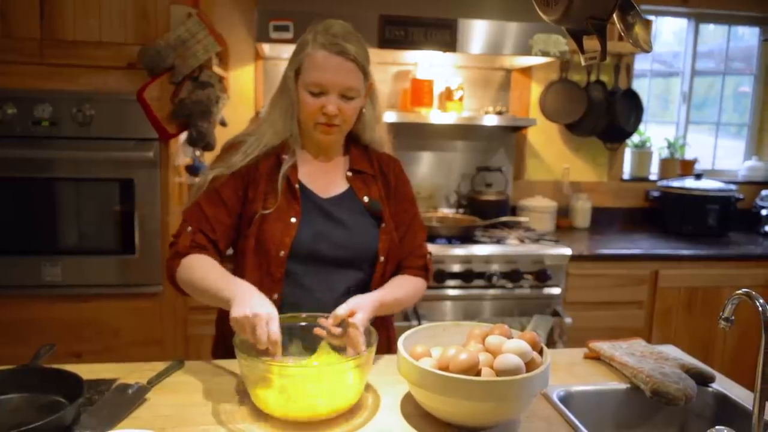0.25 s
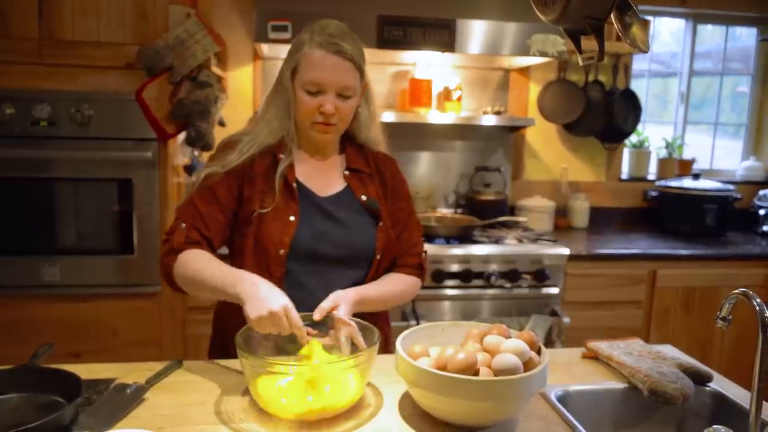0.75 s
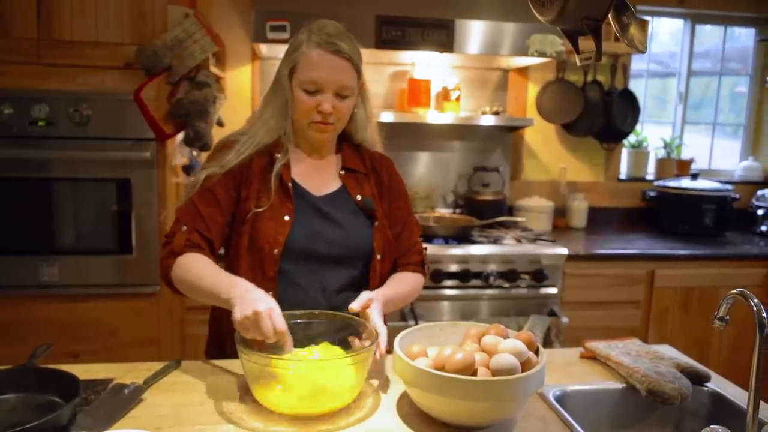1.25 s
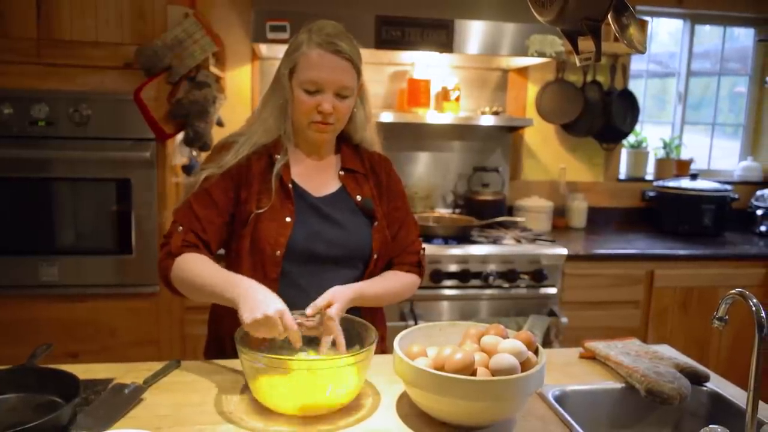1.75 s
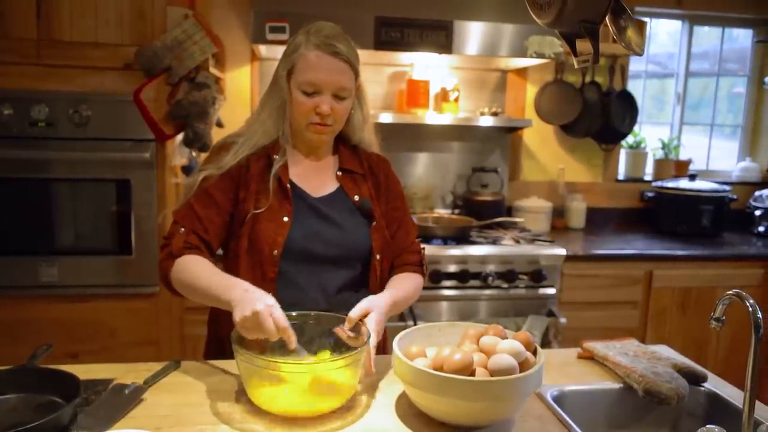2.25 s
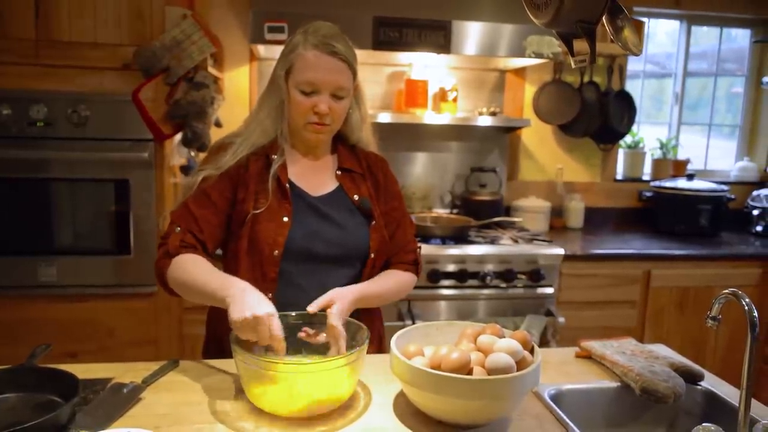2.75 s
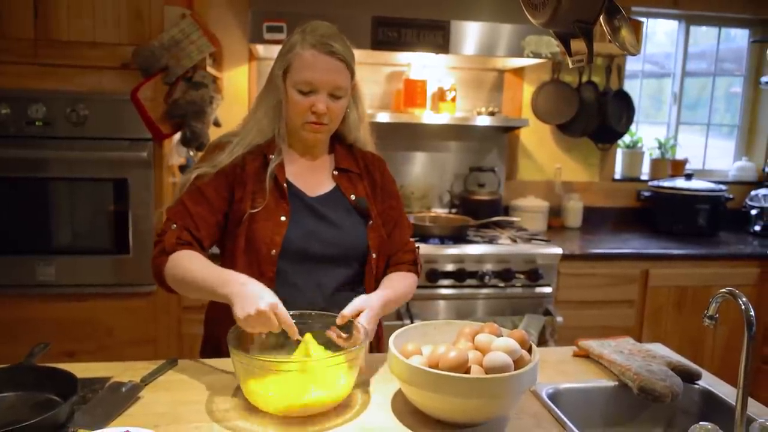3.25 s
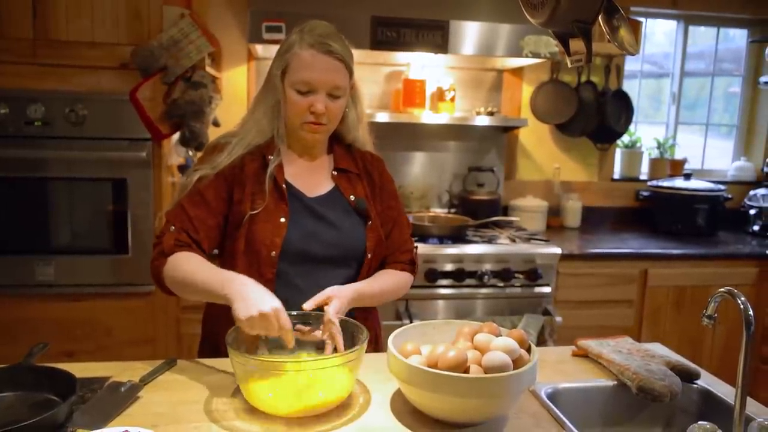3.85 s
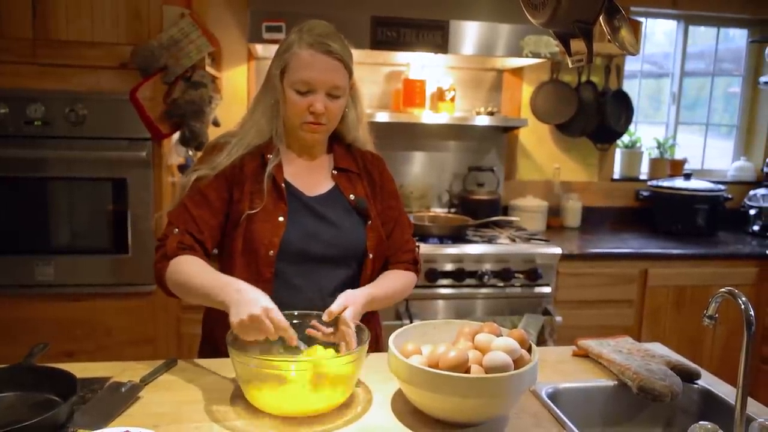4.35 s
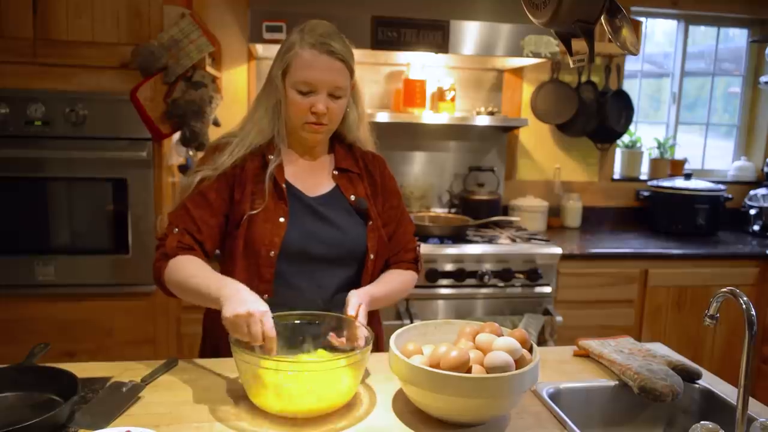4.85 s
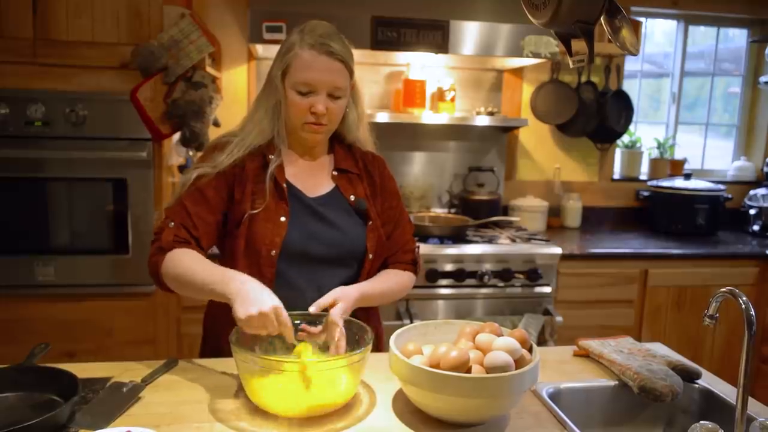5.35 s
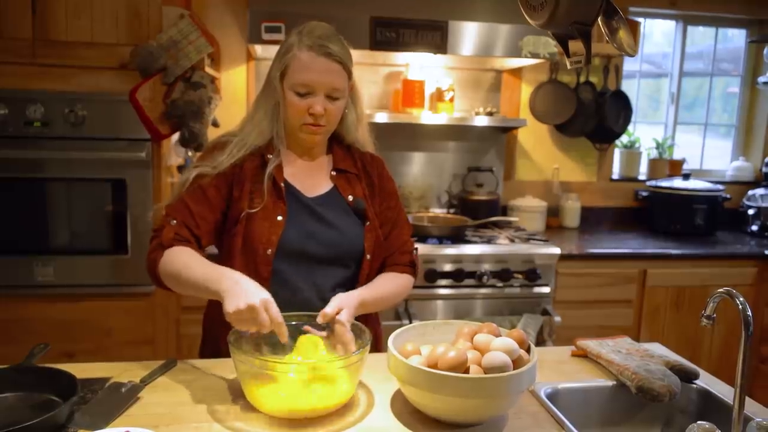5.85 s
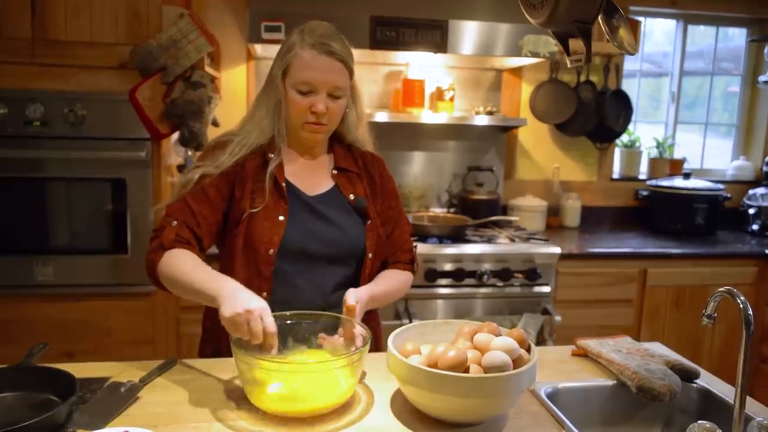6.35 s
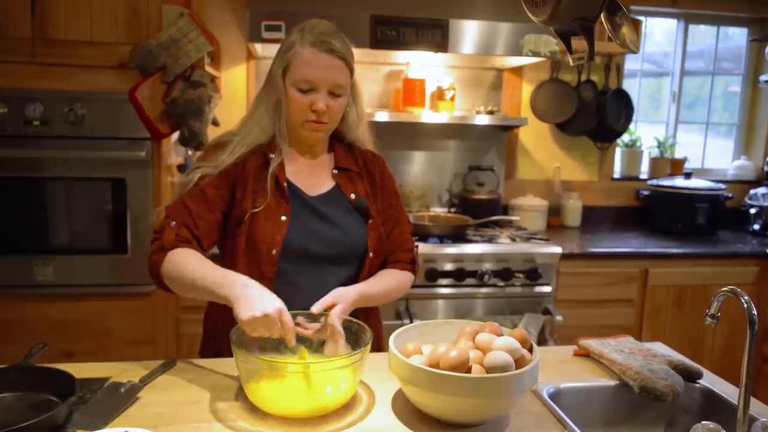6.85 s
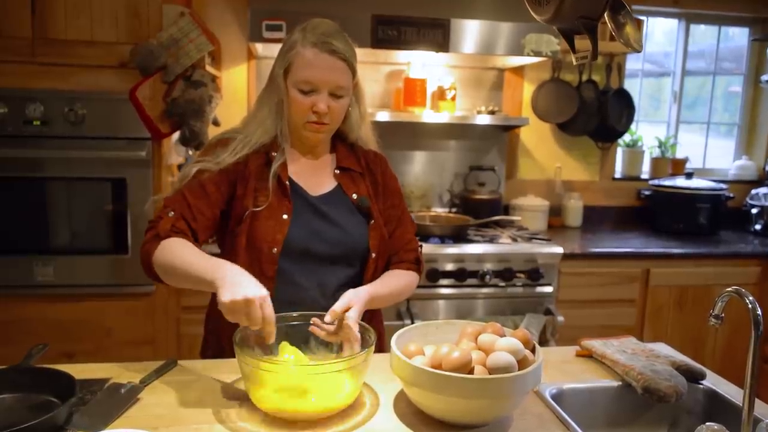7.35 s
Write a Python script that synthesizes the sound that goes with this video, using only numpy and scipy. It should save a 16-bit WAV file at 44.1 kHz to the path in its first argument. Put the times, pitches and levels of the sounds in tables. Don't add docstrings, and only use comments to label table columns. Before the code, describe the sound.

Close, brisk whisking of eggs: steel tines clink on glass in a quick even rhythm, liquid slopping and bubbling, in a quiet kitchen.

```python
import sys
import numpy as np
from scipy import signal
from scipy.fft import rfft, irfft
from scipy.io import wavfile
from scipy.ndimage import uniform_filter1d

SR = 44100
rng = np.random.default_rng(int(sys.argv[2]) if len(sys.argv) > 2 else 0)


def volts_from_decibels(level):
    exponent = np.asarray(level, float) / 20
    return 10 ** exponent


def pcm_store(signal):
    levels = np.round(np.clip(np.atleast_2d(signal), -1, 1) * 32767)
    wavfile.write(sys.argv[1], SR, levels.astype(np.int16).T)


N = 334719

# (time [s], glass ring level [dB], tine ring level [dB], contact [ms])
DIPS = [(0.104, -33.5, -39, 1.1), (0.3205, -44, -36.5, 5.3), (0.5099, -27.5, -27, 1.5),
        (0.7264, -39.5, -36.5, 8.1), (0.9481, -26.5, -28, 2.5), (1.1346, -33, -25.5, 11),
        (1.3672, -41, -40, 12), (1.5685, -41.5, -47, 6.3), (1.7704, -41, -41, 1.6),
        (1.9682, -37, -42, 0.97), (2.1671, -36.5, -39, 0.6), (2.3843, -35.5, -46, 0.6),
        (2.787, -43.5, -38, 1.9), (3.012, -41.5, -48.5, 11), (3.2156, -41, -37.5, 33),
        (3.4392, -36, -35, 0.28), (3.645, -39, -25, 17), (3.862, -41, -44, 4), (4.2765, -33, -29.5, 4.1),
        (4.4792, -43.5, -24.5, 5.3), (4.703, -41, -30, 0.7), (4.915, -39, -47, 15),
        (5.13, -40.5, -28.5, 3.6), (5.342, -41.5, -45, 34), (5.5317, -31, -34, 3.2), (5.741, -44, -48, 8.5),
        (6.8768, -27, -32, 0.9), (7.081, -37, -34, 0.45), (7.259, -45, -43, 2.3)]
# (time [s], glass ring level [dB], tine ring level [dB], contact [ms])
STRIKES = [(.127, -33, -27, 1), (0.3382, -33.5, -27.5, 0.71), (0.5406, -32.5, -31, 0.84),
           (0.7504, -30.5, -26, 0.18), (0.9652, -34.5, -30, 5.5), (1.1765, -33, -33, 3.5),
           (1.3853, -28, -24.5, 0.79), (1.588, -38, -35, 2.1), (1.7904, -34, -35, 0.94),
           (1.978, -32.5, -31.5, 5.4), (2.1854, -35.5, -29.5, 13), (2.398, -32.5, -26.5, 3.3),
           (2.818, -37.5, -33.5, 1.2), (3.0279, -37, -38, 17), (3.243, -29, -30, 1.3),
           (3.456, -31, -25, 1.06), (3.6664, -32.5, -26, 3.8), (3.8742, -27.5, -28, 2.7),
           (4.305, -30.5, -34.5, 2.2), (4.4943, -32.5, -32.5, 20), (4.7239, -42.5, -42.5, 2.9),
           (4.9454, -35, -28, 4.5), (5.161, -40, -30.5, 1.5), (5.375, -32, -26.5, 0.42),
           (5.5793, -31, -28, 2.6), (5.7883, -31, -28, 0.98), (6.8919, -44, -28.5, 1.6),
           (7.087, -33.5, -37.5, 18.4), (7.2856, -34.5, -26.5, 6.7)]
# (time [s], glass ring level [dB], tine ring level [dB], contact [ms])
SLAPS = [
    (2.5954, -30.5, -29.5, 1.4),
    (4.067, -32.5, -25.5, 2.5),
    (6.0199, -33.5, -24, 2.3),
    (6.2462, -31, -20.5, 3),
    (6.4658, -34.5, -28, 3.5),
    (6.6833, -35, -29, 1.5),
    (7.4944, -34.5, -21.5, 1.9),
]
# (time [s], glass ring level [dB], contact [ms])
RETURNS = [(0.1953, -33.5, 6.6), (0.4047, -36, 6.5), (0.6321, -41, 1), (0.8104, -36, 29),
           (1.0316, -38.5, 4), (1.4294, -37.5, 31), (1.645, -44, 26), (1.848, -38.5, 2.9),
           (2.041, -40.5, 19), (2.256, -37, 20), (2.482, -39.5, 2.9), (2.667, -47, 30),
           (3.0939, -37.5, 18.5), (3.2955, -41.5, 21), (3.5277, -38, 11), (3.7303, -39.5, 30),
           (3.952, -34, 14), (4.1647, -38.5, 10), (4.369, -41, 5.9), (4.5795, -37, 8.9), (5.018, -37.5, 19),
           (5.235, -35.5, 2.8), (5.4421, -31, 4.8), (5.647, -34, 0.79), (6.3177, -35, 2.7),
           (6.7453, -44, 3.1), (6.9463, -38, 34), (7.161, -41.5, 9.6), (7.5562, -43, 17)]
# (time [s], glass ring level [dB], contact [ms])
GRAZES = [(.001, -46.5, 26), (0.52, -46, 3.4), (1.253, -42, 15), (2.881, -46, 9.7), (3.8855, -32.5, 3.2),
          (4.938, -44.5, 2.7), (5.15, -40, 3.1), (5.3168, -36.5, 0.51), (5.3888, -50.5, 4),
          (5.762, -45, 16), (5.9268, -45, 0.2), (5.967, -48, 0.7), (6.196, -48.5, 78), (6.538, -42, 9.3),
          (6.641, -47, 5.7), (6.669, -41.5, 3.4), (6.7338, -34.5, 35), (7.4118, -45.5, 8.9),
          (0.28, -50.5, 3.4), (0.476, -51.5, 2.3), (0.673, -44, 2.2), (5.544, -34.5, 2.9),
          (3.8746, -28, 2.2), (3.601, -55, 95), (4.08, -43, 1.7), (7.3, -46, 12)]
# (frequency [Hz], bandwidth [Hz], level [dB])
GLASS_MODES = [
    (2000, 700, -16.5),
    (3160, 630, -19.5),
    (4690, 33, -20.5),
    (5610, 450, -22),
    (6260, 78, -23),
    (7480, 31, -13.5),
    (8060, 130, -19),
]
# (frequency [Hz], bandwidth [Hz], level [dB])
STEEL_MODES = [
    (10250, 260, -8),
    (11500, 300, 1),
    (12550, 340, 0),
    (14950, 500, -7),
]
# (time of peak [s], level [dB], frequency [Hz], half length [ms])
PLOPS = [(.1069, -31.5, 621, 4.8), (0.353, -34, 558, 2.3), (0.5303, -37, 576, 3.1),
         (0.9526, -18, 547.5, 2.7), (1.152, -34, 543, 4.8), (1.372, -30, 506, 5.9),
         (1.5715, -20, 496, 3.05), (1.9757, -29, 584, 3), (2.1816, -29.5, 557, 14.7),
         (2.39, -21.5, 702, 1.4), (2.5963, -13, 584, 3.4), (3.017, -20.5, 492.4, 2.9),
         (2.173, -27, 392, 4.5), (3.442, -22, 510.4, 3.5), (3.6517, -35, 583, 7), (3.8769, -23, 533, 2.85),
         (4.082, -19.5, 453.5, 2.66), (4.289, -30.5, 553, 5.3), (4.5, -21.5, 454, 4.1),
         (4.713, -40, 567, 10.5), (5.5319, -31, 683, 3.1), (6.09, -44, 498, 14), (6.4293, -23.5, 544, 2.44),
         (7.0811, -19.5, 597, 2.14), (7.4171, -26.5, 492, 8), (7.44, -35, 540, 8.2)]
# (time of peak [s], level [dB], frequency [Hz], half length [ms])
GLUGS = [(0.0259, -46.5, 609, 17), (0.1357, -44.5, 622, 19), (1.772, -31.5, 534, 3.7),
         (0.6891, -34.5, 555, 9.6), (0.8846, -42, 498, 34), (1.47, -34.5, 860, 2.5), (1.4791, -32, 564, 5),
         (1.5121, -40, 591, 15), (1.535, -39.5, 401, 14), (1.6093, -37.5, 550, 2), (1.8097, -35, 543, 4.7),
         (2.3541, -43, 716, 6.6), (2.634, -37, 570, 6.2), (2.6355, -29.5, 682, 2.8), (3.603, -39.5, 604, 6),
         (2.6799, -43, 555, 5.8), (2.7103, -41, 641, 2.7), (2.9483, -45.5, 534, 6.3),
         (3.4685, -43, 526, 4.8), (3.605, -43.5, 852, 11), (4.3325, -28, 548, 2.3), (4.301, -28, 408, 4),
         (5.133, -44.5, 722, 8.7), (5.9475, -39, 614, 6.7), (5.9764, -47, 588, 10), (6.045, -42.5, 500, 10),
         (6.112, -45.5, 712, 4.4), (6.14, -42.5, 478, 16), (6.21, -54, 698, 28), (7.1178, -40.5, 604, 20),
         (7.47, -44, 511, 9.4)]
# (time of peak [s], level [dB], frequency [Hz], half length [ms])
BLIPS = [(0.7558, -19.5, 1370.0, 2.5), (0.7817, -34.5, 1340.0, 8.1), (0.7997, -26.5, 1106, 0.99),
         (0.8007, -36.5, 823, 6.7), (0.8143, -27, 1202, 1.4), (0.9492, -30, 1750.0, 2.6),
         (0.97, -35, 1266, 3.3), (1.1808, -25, 1660, 2.9), (1.3826, -27, 1240, 3.8),
         (1.3892, -22.5, 1540.0, 3.2), (1.4373, -26.5, 1253, 6.1), (1.772, -36.5, 1085, 1.9),
         (2.0478, -32, 1090.0, 2.7), (2.1732, -38, 1065, 3.2), (2.188, -32, 1154, 3.2),
         (2.191, -23, 1392, 1.3), (2.213, -26.5, 1236, 2), (2.2587, -34, 1062, 3.3),
         (2.4073, -37.5, 1001, 8.5), (2.4165, -29, 1297, 2.2), (3.0211, -39.5, 1030.0, 3.7),
         (3.0484, -32, 1580, 6.2), (3.099, -35, 1017, 3.6), (3.4307, -30.5, 1197, 2.1),
         (3.6572, -34.5, 884, 11), (3.677, -28.5, 1308, 2), (3.734, -28.5, 1129, 2.4),
         (4.071, -33, 1180, 4.6), (4.1674, -37.5, 1047, 2.8), (4.298, -25, 1750, 1.8),
         (4.373, -34.5, 1043, 4.3), (4.9462, -25.5, 1249, 2.4), (5.0221, -31.5, 1005, 2.5),
         (5.109, -34, 1162, 4.6), (5.1635, -32, 1244, 2.2), (5.237, -33, 990, 2.9),
         (5.3476, -26, 1430, 1.5), (5.3732, -29.5, 1183, 5.3), (5.3813, -30, 1438, 4),
         (5.4706, -39, 1177, 7.5), (5.5954, -33.5, 1370.0, 3.7), (5.6502, -37, 1099, 4.8),
         (5.7943, -28.5, 1320, 3.9), (5.97, -33.5, 1585, 1.5), (6.027, -36.5, 1230, 6.2),
         (6.224, -35, 1103, 2), (6.4738, -27, 1750.0, 1.1), (6.718, -25.5, 1245, 1.9),
         (6.7449, -31.5, 1006, 4.3), (7.3096, -34, 1300, 5), (7.4173, -24, 1710, 2.4),
         (7.5064, -31, 1344, 4.2)]
# (time of peak [s], level [dB], frequency [Hz], half length [ms])
SPITS = [(0.8196, -31, 2190.0, 1.8), (0.8385, -34.5, 3110, 3.2), (1.142, -32, 2980, 2.7),
         (1.4337, -36, 3060, 2.5), (1.571, -29, 3010, 1.6), (1.7934, -35, 2200.0, 5.9),
         (1.8493, -42.5, 2290.0, 4.8), (1.9795, -29.5, 2090.0, 2.4), (2.1905, -25.5, 2080.0, 1.1),
         (2.4005, -34, 2190.0, 3.1), (2.442, -37, 2700.0, 2.7), (2.4834, -27.5, 2310.0, 1.1),
         (2.6046, -29.5, 2110.0, 2.0), (3.0306, -30, 2080.0, 2.6), (3.0274, -28.5, 3100, 1.5),
         (3.1, -40, 2210.0, 3.8), (3.505, -39.5, 2940, 2), (3.533, -33.5, 2290.0, 3.3),
         (3.8902, -29, 2090.0, 2), (3.9568, -30, 2310.0, 4.3), (3.9635, -35, 3160, 3.8),
         (4.0684, -31.5, 2230.0, 1.8), (4.071, -34.5, 2850, 3.5), (4.3753, -40.5, 3310, 4.8),
         (4.5152, -41, 2060.0, 6.4), (4.5835, -36.5, 3400, 3.8), (4.589, -38, 2340, 11),
         (4.9483, -32.5, 2210, 5.7), (5.0264, -32, 2986, 2.8), (5.0296, -38.5, 3360, 6.5),
         (5.2445, -39.5, 2400, 8.7), (5.38, -34.5, 3980, 4.1), (5.5958, -35.5, 3000, 1.8),
         (5.7896, -29, 3320, 2), (7.3224, -36.5, 2060.0, 3.4), (6.3201, -31.5, 2200.0, 3),
         (6.5466, -38.5, 1985, 6.8), (6.7407, -37.5, 2000.0, 7.1), (6.8686, -38, 2330.0, 3.5),
         (6.951, -25.5, 3196, 0.56), (7.1646, -30.5, 2250.0, 3.4), (7.297, -35.5, 2840, 3.1)]
# (time of peak [s], level [dB], frequency [Hz], half length [ms])
PINGS = [(0.1297, -30, 5720, 1.6), (0.525, -29.5, 5780, 3.9), (0.8163, -34, 7330, 3.4),
         (1.0346, -32, 5000, 3.4), (1.137, -26, 5300, 1.6), (1.141, -31.5, 6350, 4.3),
         (1.1559, -42.5, 5590.0, 11), (1.9785, -31, 5760, 1), (2.187, -40, 5700.0, 6.7),
         (2.404, -34, 5860, 6.3), (3.221, -37, 5480, 4.1), (3.2446, -28, 5670.0, 1.2),
         (3.5295, -34, 4770.0, 2.5), (3.652, -32, 5500, 3.1), (3.8767, -31, 4770.0, 1.7),
         (3.955, -25.5, 4755, 1.7), (4.1725, -38.5, 4530.0, 3), (4.48, -28, 5250, 1.2),
         (5.0268, -31.5, 4690.0, 5.9), (5.3805, -36.5, 5620, 8.1), (5.4434, -30.5, 4560, 1.3),
         (5.5804, -31, 5400.0, 3.4), (5.6487, -27.5, 4880.0, 1.9), (5.7938, -34, 5350, 3.1),
         (6.025, -26.5, 5320, 1.3), (6.2478, -32.5, 6330, 3.4), (6.686, -29.5, 5570.0, 1.9),
         (6.746, -39, 7530, 5.7), (6.8938, -33, 5710.0, 2.4), (6.9656, -35, 4640.0, 1.1),
         (7.4946, -33.5, 6590, 2.2)]
# (time of peak [s], level [dB], frequency [Hz])
KNOCKS = [(0.21, -39, 275), (0.3499, -34.5, 287), (0.8708, -35, 274), (1.479, -28, 330.3),
          (1.507, -32.5, 274.7), (1.6664, -39.5, 304), (1.7738, -23, 353), (1.8732, -42.5, 308),
          (1.973, -29.5, 321), (2.268, -34.5, 348), (3.259, -40, 306), (3.462, -42, 281), (3.54, -45, 306),
          (3.745, -44.5, 261), (3.96, -35, 338), (4.17, -43.5, 341), (4.392, -42.5, 267),
          (4.5872, -40, 324.4), (4.773, -43.5, 296.5), (5.0278, -37.5, 330), (5.245, -40, 328),
          (5.4492, -36.5, 320.5), (5.625, -42, 301), (5.6516, -40.5, 307), (5.831, -39.5, 290),
          (6.056, -38, 255.5), (6.083, -37, 282), (6.108, -37.5, 305), (6.3419, -39, 243),
          (6.548, -47, 357), (6.765, -41, 274), (6.966, -33, 279), (7.171, -41.5, 347), (7.5081, -43, 292)]
# (pitch ratio, relative level [dB])
KNOCK_OVERTONE = (2, -17.5)
# (time of peak [s], level [dB])
CLUNKS = [(0.1059, -27.5), (0.2822, -42), (0.329, -17.5), (0.508, -29), (1.9698, -22), (2.5924, -22.5),
          (3.229, -17), (4.08, -24.5), (4.297, -23), (7.121, -34.5), (1.206, -37.5), (5.4433, -39),
          (6.2475, -30.5), (6.32, -26), (6.8758, -22.5), (6.951, -24.5)]
# (frequency [Hz], bandwidth [Hz], level [dB])
BODY_MODES = [
    (275, 18, 5),
    (350, 22, 1),
    (552, 22, 1.5),
    (670, 34, 4),
    (870, 30, -1),
    (1070, 35, 2.5),
]
# (frequency [Hz], reverberation time [s])
ROOM_DECAY = [
    (300, 0.4),
    (3000, 0.14),
    (15000, 0.41),
]
# (frequency [Hz], level [dB per Hz])
AIR_SPECTRUM = [
    (500, -36),
    (1000, -2),
    (16000, -24),
]
# (time [s], rumble level [dB])
ROCKING = [
    (1.4, -65.5),
    (2.8, -66.5),
    (4.4, -68.5),
    (5.4, -63),
    (7.6, -64),
]
# (frequency [Hz], bandwidth [Hz], level [dB])
COUNTER_MODES = [(67.0, 36, 0.5), (158.7, 48, 6.2)]

DIP_HZ, STRIKE_HZ, RETURN_HZ, GRAZE_HZ = 6000, 5750, 4700, 5200
RETURN_STEEL_DB, GRAZE_STEEL_DB = 1.5, -3.5
REFERENCE_DB = -30
TOUCH_LEAD = 400
POCKET_LEAD = .03


def fork():
    touches = [(*row, DIP_HZ) for row in DIPS]
    touches += [(*row, STRIKE_HZ) for row in STRIKES + SLAPS]
    touches += [(s, db, db + RETURN_STEEL_DB, ms, RETURN_HZ) for s, db, ms in RETURNS]
    touches += [(s, db, db + GRAZE_STEEL_DB, ms, GRAZE_HZ) for s, db, ms in GRAZES]
    clicks = np.zeros(N)
    for s, *touch in touches:
        add(clicks, s - TOUCH_LEAD / SR, tine(*touch))
    return clicks


def tine(glass_db, steel_db, ms, place_hz):
    t, hz = np.arange(-TOUCH_LEAD, 8192 - TOUCH_LEAD) / SR, np.fft.rfftfreq(8192, 1 / SR)
    contact = np.exp(-t / (ms * 0.00051)) * np.clip(t / (ms * 0.00009), 0, 1)
    drag = 0.033 * np.exp(-abs(t) / np.where(t < 0, .004, .02))

    octave_gap = np.log(np.array(GLASS_MODES)[:, :1] / place_hz)
    near = volts_from_decibels(9 * np.exp(-(octave_gap / .06) ** 2))
    spot = volts_from_decibels(5 * rng.standard_normal((len(GLASS_MODES) + len(STEEL_MODES), 1)))
    steel_spot, glass_spot = spot[:len(STEEL_MODES)], spot[len(STEEL_MODES):]
    wet = 1 + .007 * rng.standard_normal(2)

    grit = rng.standard_normal(len(hz))
    fine = evened(uniform_filter1d(grit, size=40))
    broad = evened(uniform_filter1d(grit, size=350))
    minor = causal(volts_from_decibels(4.5 * fine + 3.5 * broad))
    scrape = 0.19 / (1 + (hz / 7500) ** 4) * hz / (hz + 900) * minor
    glass = (np.maximum(near * 2.14, glass_spot) * modes(GLASS_MODES, hz * wet[0])).sum(0) + scrape
    steel = (steel_spot * modes(STEEL_MODES, hz * wet[1])).sum(0) + 0.042 * minor * (hz / 12000) ** 2

    dull = 1 / (1 + 1j * hz / 3000) ** 2
    floor_db = glass_db - 4.5 + 0.16 * (glass_db - REFERENCE_DB + 4)
    out = 0
    for db, body in ((floor_db, glass * dull), (glass_db, glass * (1 - dull)), (steel_db, steel)):
        clumps = volts_from_decibels(7 * evened(uniform_filter1d(rng.standard_normal(len(t)), size=90)))
        grains = rng.standard_normal(len(t)) * volts_from_decibels(3.95 * np.minimum(rng.exponential(1, len(t)), 5))
        chatter = grains * (contact * clumps ** .5 + drag * clumps)
        ring = irfft(rfft(chatter) * body)
        loudest = np.sqrt(uniform_filter1d(ring ** 2, size=88).max())
        out = out + volts_from_decibels(db) * ring / loudest
    return out * np.clip((.165 - t) / .03, 0, 1)


def pockets():
    egg = np.zeros(N)
    for s, *row in PLOPS + GLUGS + BLIPS + SPITS:
        add(egg, s - POCKET_LEAD, pocket(*row, climb=.04))
    for s, *row in PINGS:
        add(egg, s - POCKET_LEAD, pocket(*row, climb=0, rough=.02, linger=.15))
    knock = dict(ms=4.32, shortening=0.33)
    for s, db, hz in KNOCKS:
        add(egg, s - POCKET_LEAD, burst(db, hz, **knock))
    for s, db in CLUNKS:
        add(egg, s - POCKET_LEAD, burst(db, 1090, ms=1.83, shortening=0.62))
    ratio, overtone_db = KNOCK_OVERTONE
    for s, db, hz in KNOCKS:
        add(egg, s - POCKET_LEAD, burst(db + overtone_db, hz * ratio, **knock))
    return egg


def pocket(db, hz, ms, climb, rough=0.047, linger=0):
    t = np.arange(-POCKET_LEAD, .15, 1 / SR)
    rise = 2. ** -((t * 1500 / ms) ** 2)
    fall = 2. ** -(abs(t * 1100 / ms) ** 1.37)
    swell = np.where(t < 0, rise, fall)
    swell = np.maximum(swell, linger * np.exp(-t / 0.033) * (t > 0))
    wobble = evened(uniform_filter1d(rng.standard_normal(len(t)), size=int(2 * SR / hz)))
    glide = climb * np.tanh(t * 500 / ms)
    roughness = rough * wobble * np.tanh(abs(t) * 700 / ms)
    turns = np.cumsum(hz * (1 + glide + roughness)) / SR
    return volts_from_decibels(db) * swell * np.sin(2 * np.pi * (turns + rng.random()))


def burst(db, hz, ms, shortening):
    return pocket(db, hz, ms * volts_from_decibels(shortening * (REFERENCE_DB - db)), climb=.04)


def froth(stir):
    wake = signal.lfilter([1], [1, -np.exp(-1 / (.03 * SR))], abs(stir))
    wake = np.roll(uniform_filter1d(wake, size=700), -150)
    t, out = np.arange(1800) / SR, np.zeros(N)
    for hz in np.r_[np.geomspace(250, 380, num=3), 560, np.geomspace(780, 7000, num=26)]:
        bursts = rng.random(N) < 45 / SR
        pops = bursts * volts_from_decibels(6 * np.minimum(rng.exponential(1, N), 2.5)) * wake
        grain = np.sin(2 * np.pi * hz * t * (1 + 5 * t)) * t * hz * np.exp(-t * hz / 3.5)
        weight = (hz / 1000) ** -.1 * hz / (hz + 600)
        out += signal.oaconvolve(pops, grain * weight)[:N]
    return volts_from_decibels(-53) * evened(out)


def kitchen(x):
    hz, t, spectrum = signal.stft(rng.standard_normal((2, SR // 2)), SR, nperseg=256)
    decay = volts_from_decibels(-60 * t / read(ROOM_DECAY, hz)[:, None])
    tails = signal.istft(spectrum * decay, SR, nperseg=256)[1]
    tails *= np.clip(np.arange(tails.shape[1]) / (0.0014 * SR) - .5, 0, 1)
    sway = 2 * np.pi * 1.7 * np.arange(N) / SR
    fed = x * np.array([np.cos(sway), np.sin(sway)])
    return signal.fftconvolve(fed, tails / np.linalg.norm(tails[0]), axes=1).sum(0)[:N]


def hum(stir):
    hz = np.fft.rfftfreq(N, 1 / SR)
    air = evened(irfft(rfft(rng.standard_normal(N)) * volts_from_decibels(read(AIR_SPECTRUM, hz)), N))
    counter = modes(COUNTER_MODES, hz).sum(0) * hz / (hz + 60)
    rumble = evened(irfft(rfft(rng.standard_normal(N)) * counter, N))
    lumps = evened(uniform_filter1d(rng.standard_normal(N), size=4000))
    strokes = evened(np.roll(uniform_filter1d(abs(stir), size=2600), 900))
    shove = evened(0.57 + strokes ** 1.5)
    rocking_db = np.interp(np.arange(N) / SR, *np.transpose(ROCKING))
    return volts_from_decibels(-76) * air + volts_from_decibels(-2 + rocking_db + 3.2 * lumps) * shove * rumble


def modes(table, hz):
    f, width, db = np.transpose(table)[:, :, None]
    return volts_from_decibels(db) / (1 + 2j * (hz - f) / width)


def causal(gain):
    echo = irfft(np.log(gain))
    half = len(echo) // 2
    echo[1:half] *= 2
    return np.exp(rfft(echo[:half], len(echo)))


def evened(x):
    return x / np.sqrt(np.mean(abs(x) ** 2) + 1e-20)


def read(points, hz):
    f, value = np.transpose(points)
    return np.interp(np.log(hz + 1), np.log(f + 1), value)


def add(mix, s, sound):
    at = round(s * SR)
    part = mix[max(at, 0):at + len(sound)]
    part += sound[max(-at, 0):][:len(part)]


def scene():
    clicks, egg = fork(), pockets()
    dry = clicks + egg + froth(clicks + .5 * egg)
    dry = signal.sosfilt(signal.butter(2, 220, "high", fs=SR, output="sos"), dry)
    hz = np.fft.rfftfreq(N, 1 / SR)
    bowl = irfft(rfft(dry) * modes(BODY_MODES, hz).sum(0), N)
    spread = .55 + volts_from_decibels(15) * modes(GLASS_MODES, hz).sum(0) + 1 / (1 + 1j * hz / 1500)
    radiated = irfft(rfft(dry - 0.17 * egg) * spread, N)
    return (dry + bowl + volts_from_decibels(-9.5) * kitchen(radiated) + hum(clicks))[None]


def top_cut(x):
    return signal.sosfilt(signal.butter(12, 16980, fs=SR, output="sos"), x)


def record(dry):
    edge = signal.firwin(301, 15950, window=("kaiser", 6), fs=SR)
    mix = signal.oaconvolve(dry, edge[None], "same")
    return top_cut(mix)


dry = scene()
out = record(dry)
pcm_store(out)
```